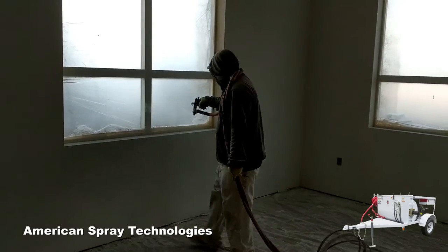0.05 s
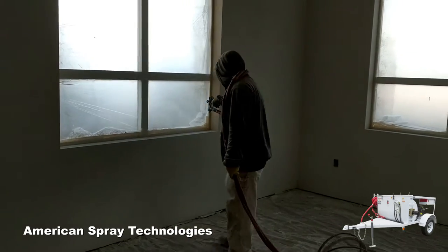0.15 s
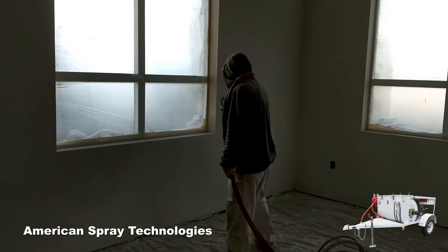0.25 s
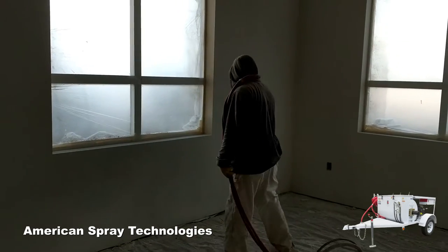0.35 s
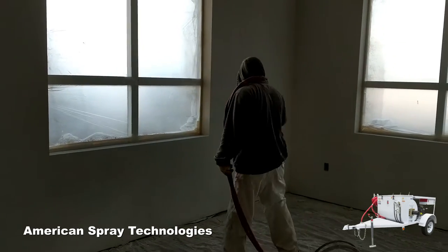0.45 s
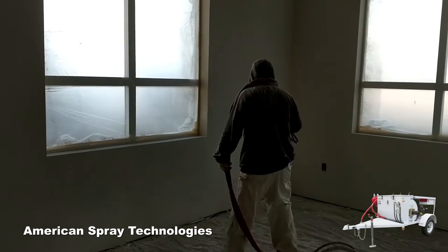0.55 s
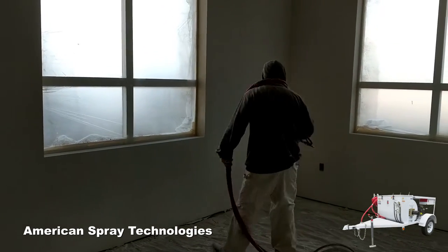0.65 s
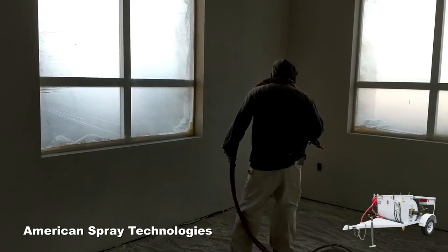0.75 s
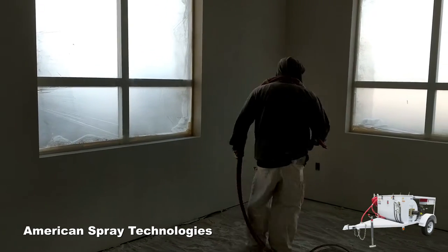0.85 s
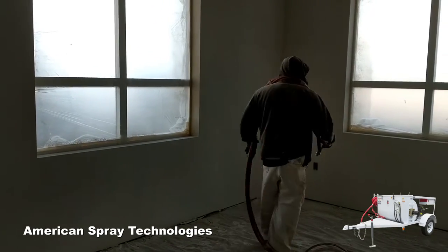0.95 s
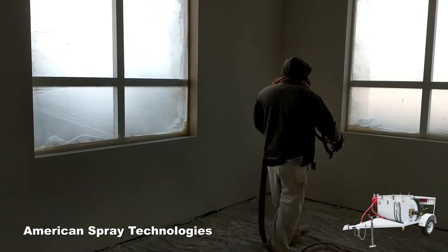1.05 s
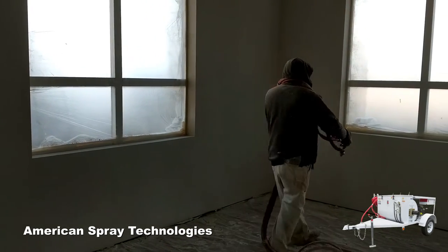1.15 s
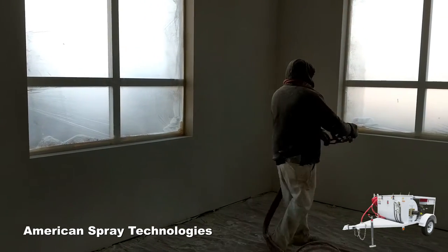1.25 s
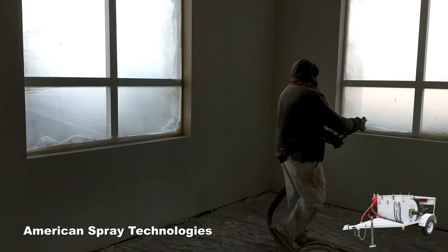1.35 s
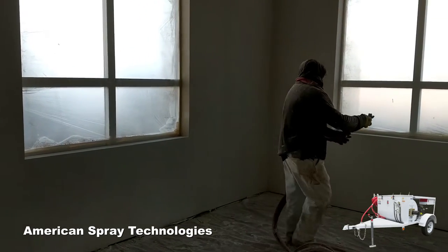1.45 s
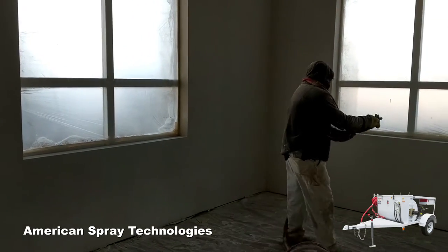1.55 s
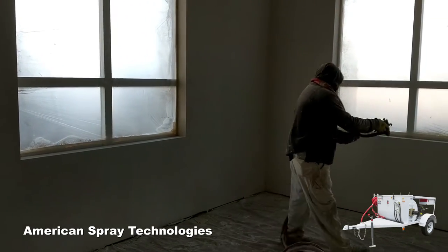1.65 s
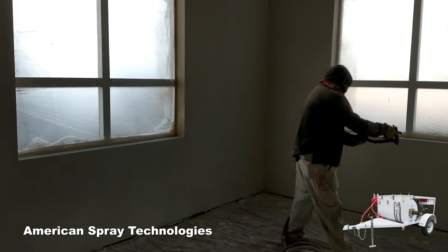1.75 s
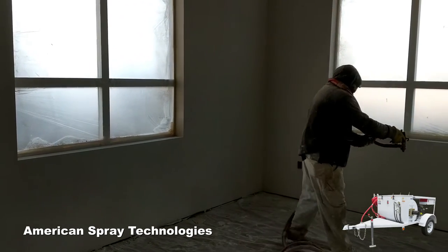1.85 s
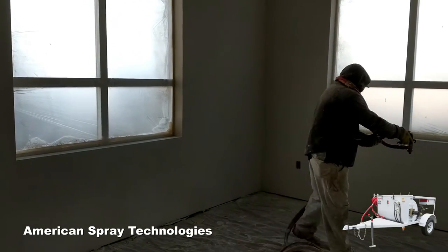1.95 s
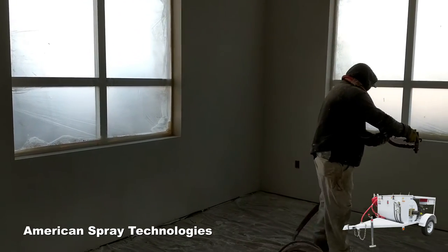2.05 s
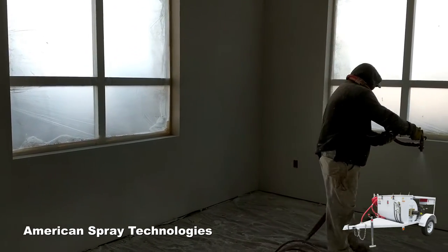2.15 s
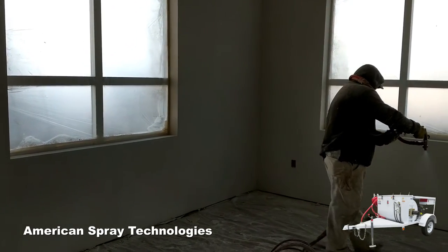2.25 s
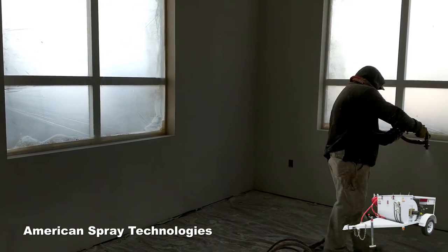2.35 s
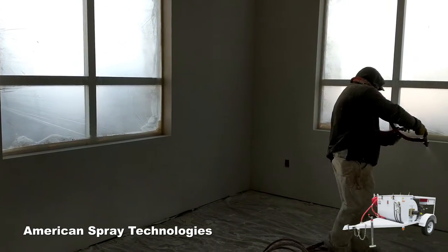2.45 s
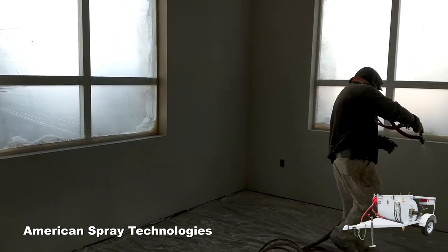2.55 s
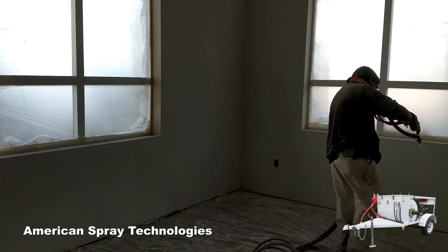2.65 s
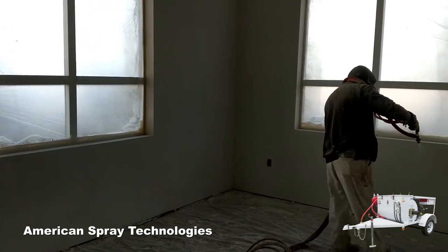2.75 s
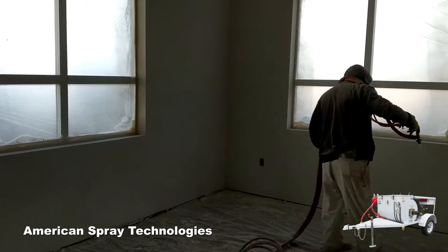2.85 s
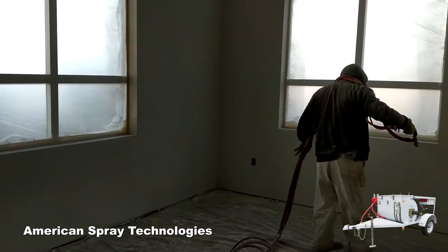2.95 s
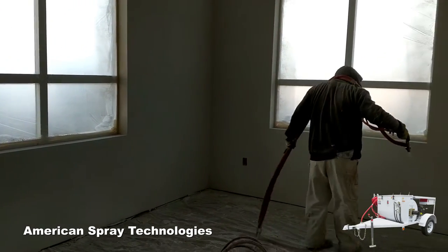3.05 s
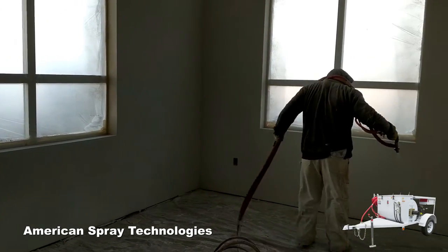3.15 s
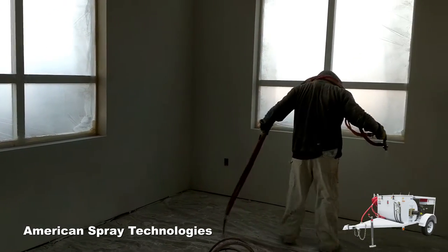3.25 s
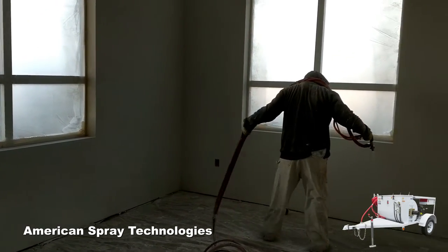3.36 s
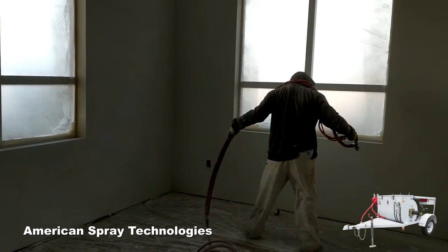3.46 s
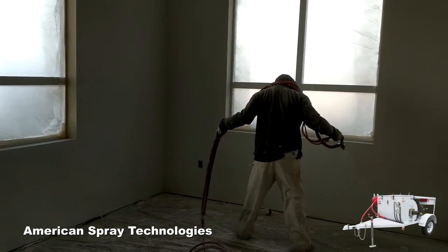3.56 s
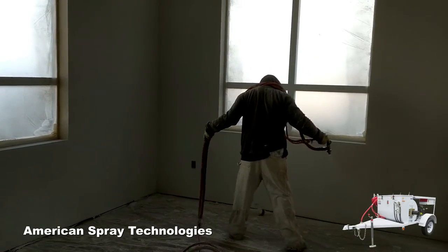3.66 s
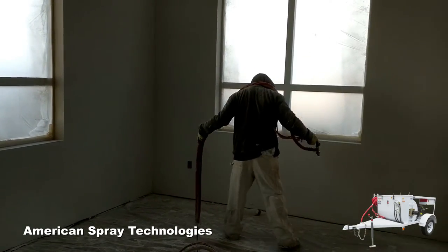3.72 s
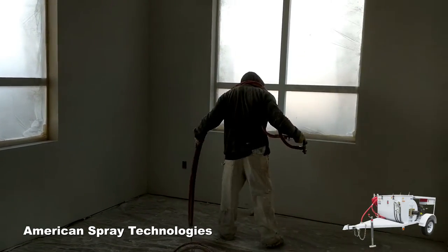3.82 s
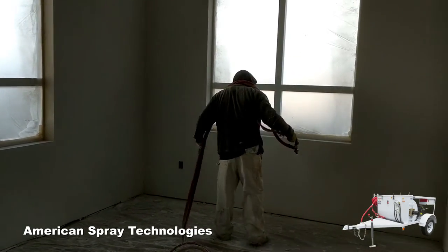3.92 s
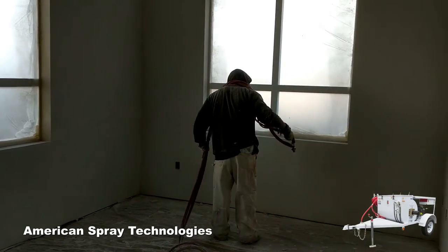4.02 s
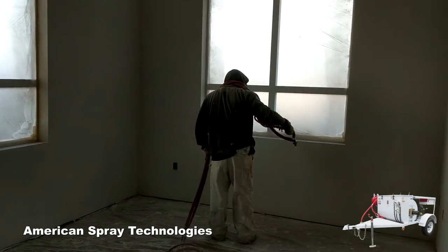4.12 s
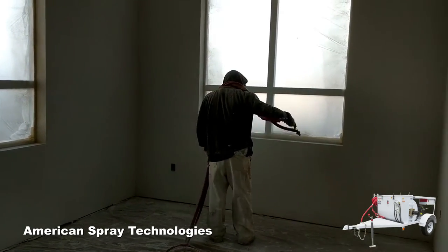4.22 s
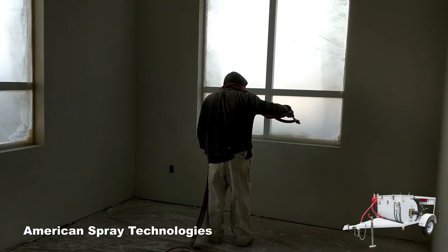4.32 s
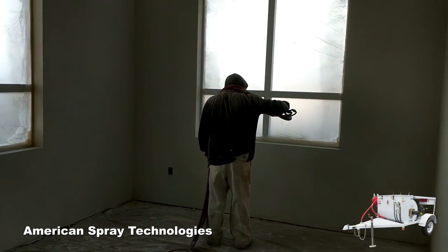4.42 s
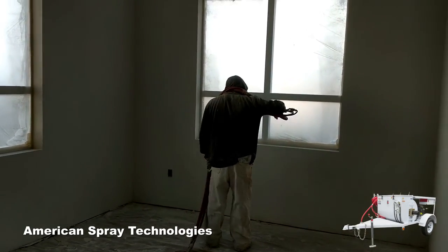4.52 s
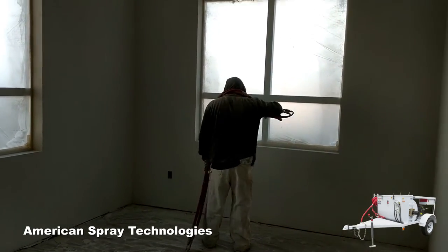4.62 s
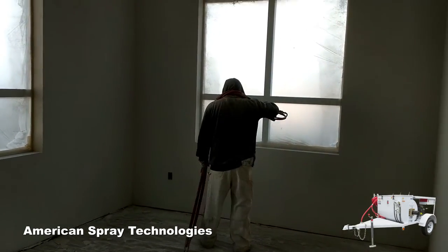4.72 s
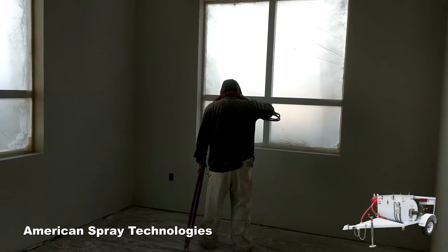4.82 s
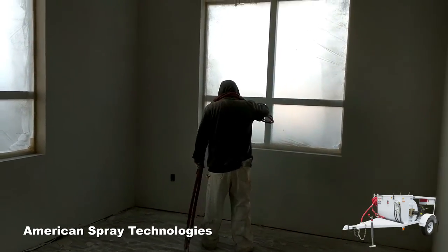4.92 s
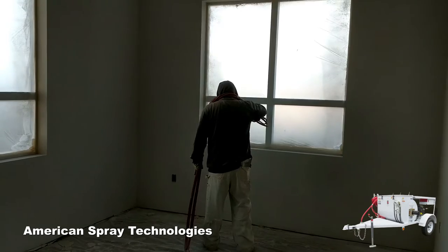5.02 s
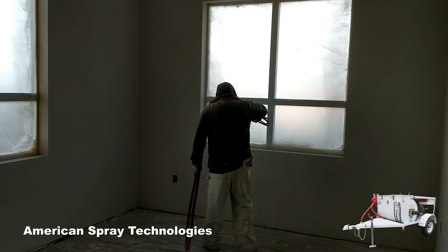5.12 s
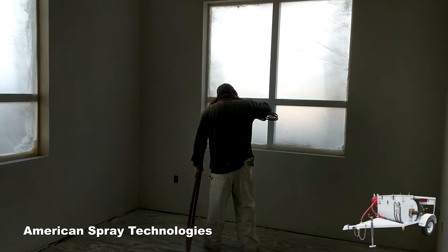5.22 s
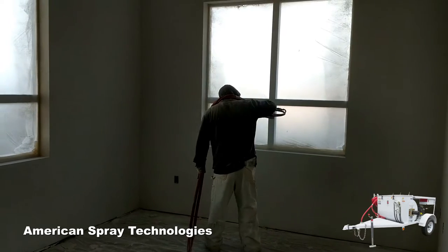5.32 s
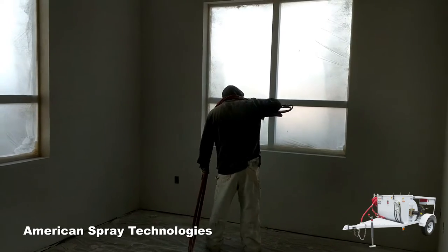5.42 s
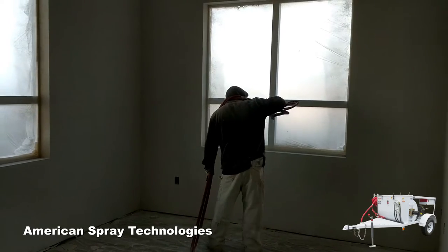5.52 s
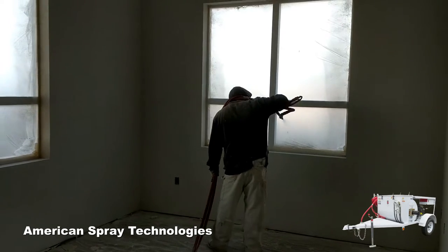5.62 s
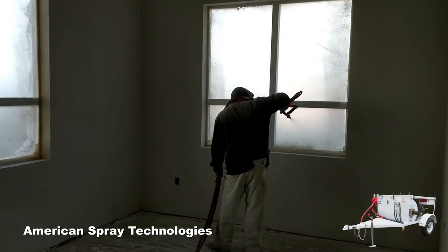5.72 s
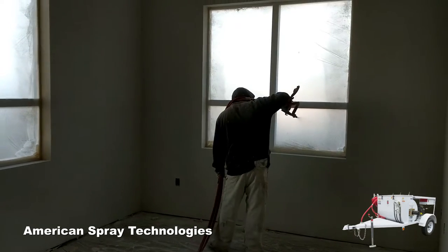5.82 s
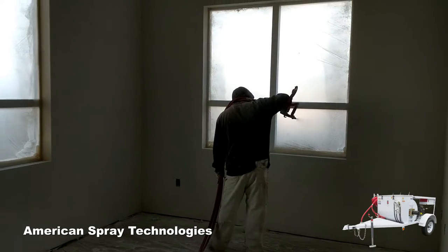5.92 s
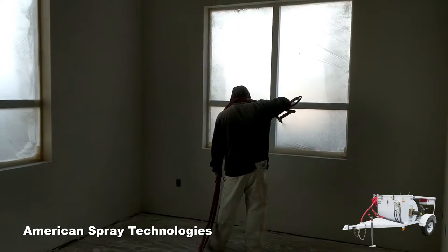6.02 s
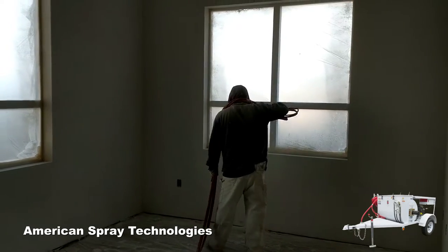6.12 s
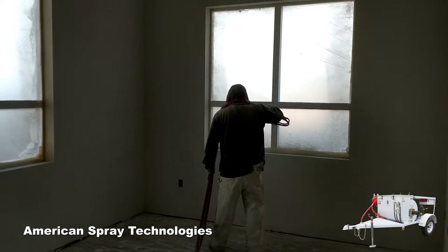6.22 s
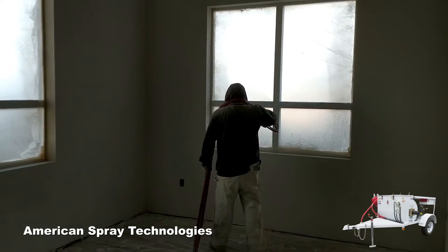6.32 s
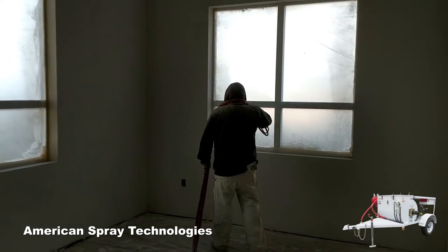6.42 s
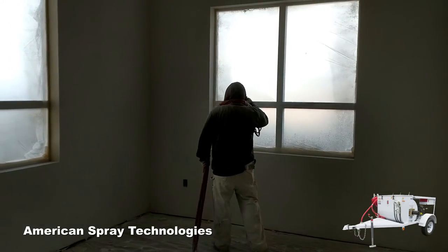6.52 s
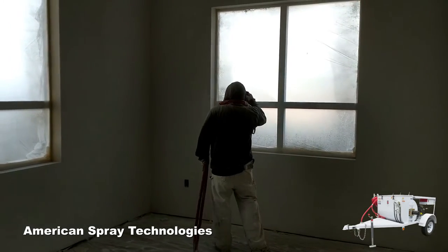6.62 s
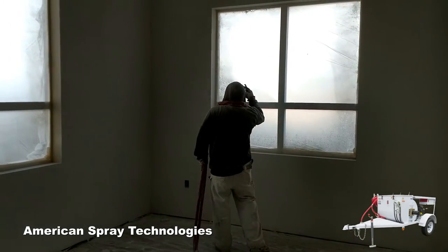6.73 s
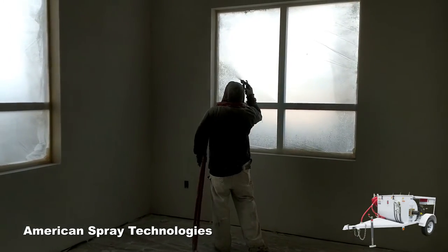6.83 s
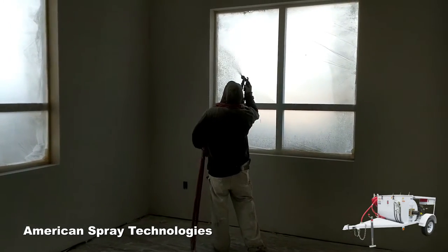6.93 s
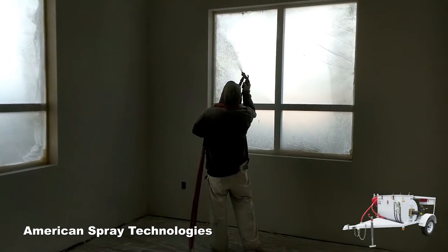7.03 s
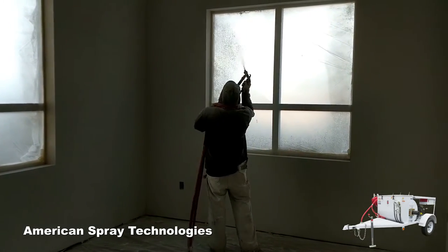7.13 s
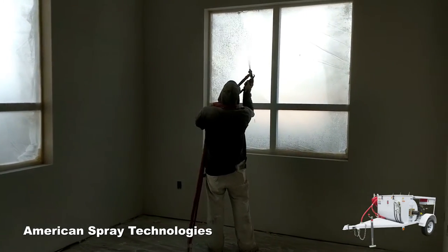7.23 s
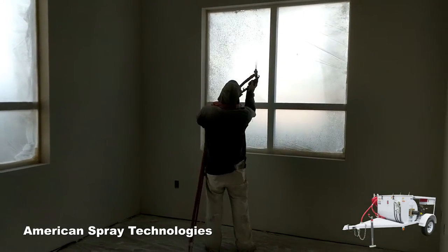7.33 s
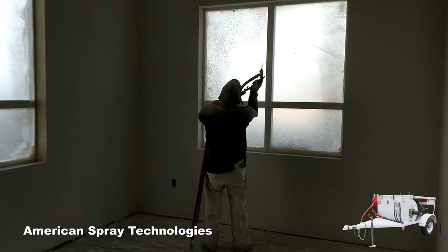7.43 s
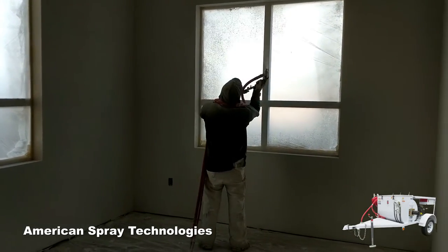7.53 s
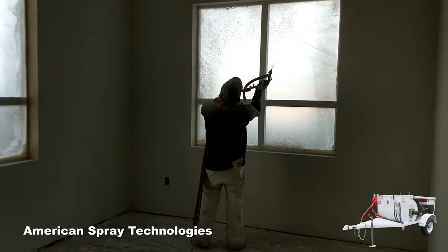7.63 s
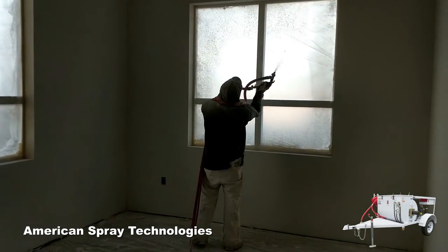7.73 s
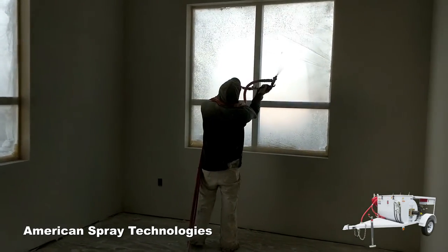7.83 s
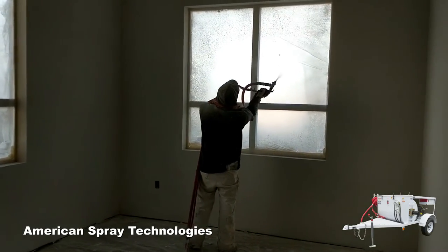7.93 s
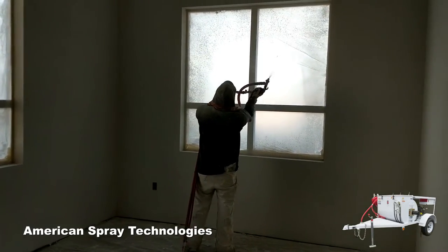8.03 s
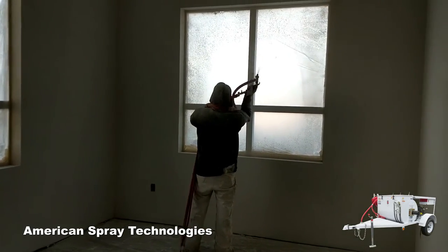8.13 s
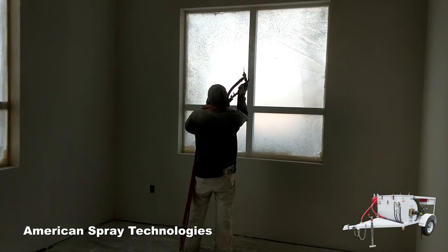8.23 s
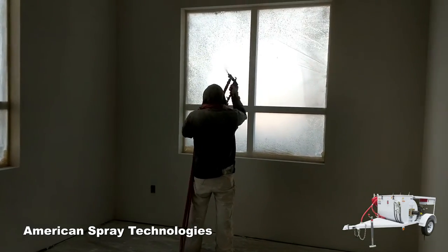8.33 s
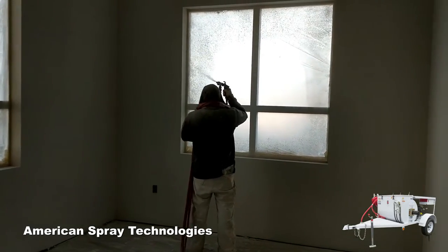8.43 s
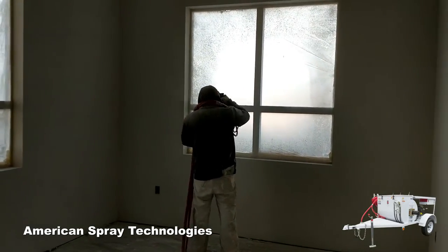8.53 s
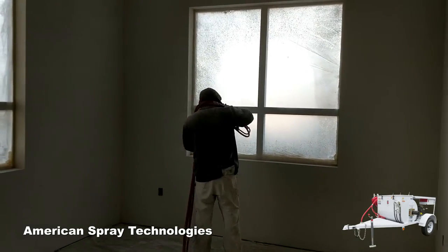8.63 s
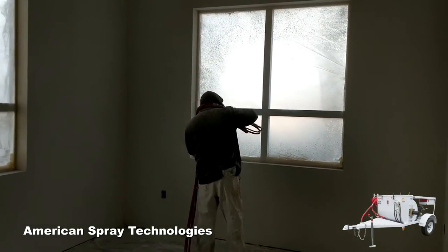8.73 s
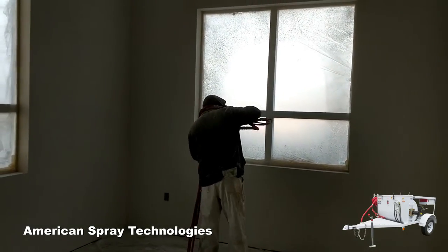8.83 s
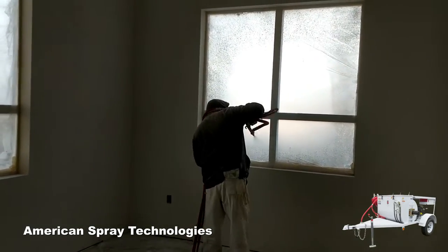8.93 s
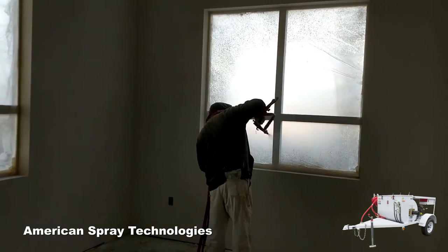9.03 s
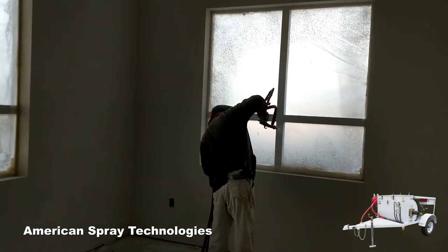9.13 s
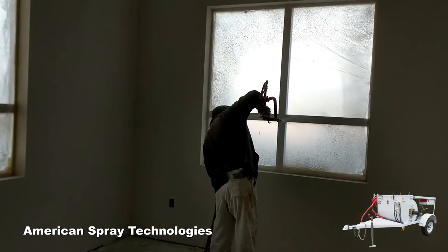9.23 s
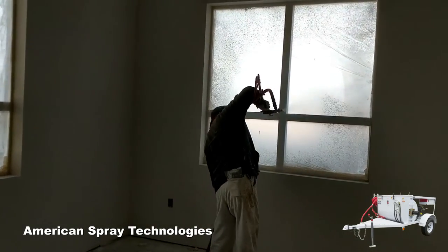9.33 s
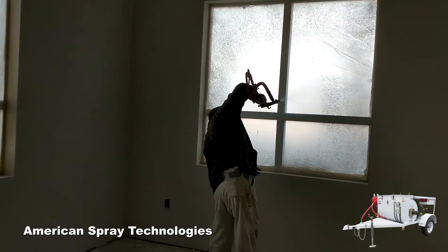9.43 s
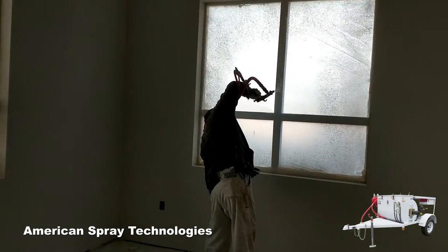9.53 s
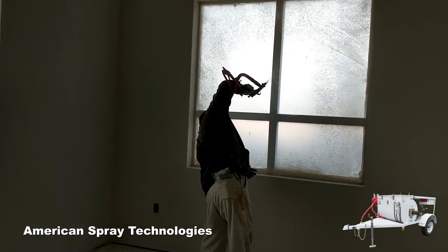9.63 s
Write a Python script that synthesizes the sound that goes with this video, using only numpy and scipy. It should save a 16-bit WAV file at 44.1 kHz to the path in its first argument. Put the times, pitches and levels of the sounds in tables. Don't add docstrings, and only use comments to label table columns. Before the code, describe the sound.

Inside an empty, echoing room, a texture sprayer hisses briefly, then pauses. Quiet steps on plastic grow louder, with sharp creasing snaps and a short hose groan over a muffled motor. The trigger opens again with a burst of air, turning into a harsh, wet, uneven spray that continues to the end; dull wind thumps hit the camera microphone, mostly on the right.

```python
import sys
import numpy as np
from scipy import signal
from scipy.fft import rfft, irfft, next_fast_len
from scipy.io import wavfile
from scipy.ndimage import uniform_filter1d, map_coordinates

SR = 44100
rng = np.random.default_rng(int(sys.argv[2]) if len(sys.argv) > 2 else 0)


def to_wav(s):
    ch = np.atleast_2d(s).T
    pcm = np.round(np.clip(ch, -1, 1) * 32767)
    wavfile.write(sys.argv[1], SR, pcm.astype(np.int16))


def ratio(d):
    e = np.asarray(d, float) / 20
    return 10 ** e


N = 426447

RELEASE_S, PULL_S, MUD_S = 0.33, 2.0285, 2.12

# f/Hz, level/dB
JET_COLOUR = [(30, -27), (250, -23.5), (700, -18), (1100, -14.5), (1700, -8.5), (2500, -5), (3300, -1),
              (3800, -2.5), (4500, -1.5), (6000, -2), (7500, 0.5), (9000, -2.5), (11500, -1), (15500, -4)]
# t/s, blast level/dB, splatter on the wall level/dB
MUD_FLOW = [(2.1, -19, 5), (2.2, -22, -1.5), (2.7, -25, 2), (3.5, -25, 4), (4.1, -25.5, -0.5),
            (4.85, -25, 2), (5.55, -23, -0.5), (6.8, -22.5, 0), (7.6, -21, 0), (8.25, -21, 0.5),
            (8.4, -23, -1), (8.85, -22.5, -1.5), (9.15, -22, 1.5), (9.67, -21, -1)]
# t/s, level change/dB, half length/s
MUD_SLUGS = [(2.758, -2, 0.037), (2.908, 2, 0.098), (3.067, -0.5, .04), (3.208, 2, 0.047), (3.6, 1, 0.046),
             (3.667, 4.5, 0.023), (3.75, 0, .02), (4.143, 1, .08), (4.37, 1, .1), (4.89, -1.5, 0.032),
             (5.057, 3, 0.05), (5.11, -6.5, .02), (5.345, 3, 0.022), (5.623, 0.5, 0.072), (6.22, 1, .05),
             (6.29, -2.5, .02), (6.713, 1, .03), (6.91, 0, 0.028), (7.66, -1.5, .05), (7.8, -2, .03),
             (7.88, -0.5, .04), (8.14, 0, .03), (9.206, -2, 0.065)]
# t/s, level/dB, slide or hold/s
FOOTSTEPS = [
    (1.0, -54, .01),
    (1.065, -54.5, 0.033),
    (1.23, -65, .03),
    (1.325, -51.5, 0.034),
    (1.49, -63, .01),
    (1.555, -48, 0.082),
    (1.74, -50, .01),
    (1.795, -47, 0.0084),
    (1.83, -54, 0.089),
    (2.01, -41.5, .02),
]
# t/s, peak level/dB
CREASE_SNAPS = [
    (1.3494, -38),
    (1.5544, -42),
    (1.7729, -20),
    (1.782, -23),
]
# f/Hz, level/dB
SHEET_COLOUR = [(300, -6), (1500, -7), (3300, -1), (7000, -4), (15500, -12)]
# t/s, hum f/Hz, level/dB
HOSE_HUM = [
    (1.62, 270, -72),
    (1.7, 283, -49),
    (1.77, 310, -51),
    (1.85, 348, -57),
    (2.0, 351, -51),
    (2.06, 352, -70),
]
# t/s, peak level/dB, push (1) or pull (-1), starting f/Hz
DRAUGHT_POPS = [(2.199, -27.5, 1, 161), (4.203, -38, 1, 300), (4.271, -38, -1, 200), (4.438, -38, 1, 280),
                (5.559, -22, -1, 220), (5.64, -28.5, 1, 238), (5.661, -28, 1, 130), (5.757, -38, 1, 240),
                (6.752, -28.5, -1, 120), (6.786, -28, -1, 210), (7.23, -24.5, 1, 190),
                (7.257, -31, -1, 280), (7.37, -28, -1, 210), (7.598, -32, 1, 240), (7.991, -32.5, -1, 240),
                (8.043, -32.5, 1, 200), (8.208, -27, -1, 300), (8.239, -21.5, -1, 220),
                (8.276, -24, 1, 210), (8.296, -34, 1, 170), (8.978, -34, 1, 110), (9.056, -32.5, -1, 230),
                (9.238, -30, 1, 240), (9.262, -25, -1, 190), (9.39, -25, -1, 120), (9.424, -26, 1, 90),
                (9.466, -27, -1, 120), (9.664, -29.5, -1, 110)]
# multiple of the firing rate, level/dB
ENGINE_ORDERS = [(1, -40), (2, -23), (3, -19), (4, -13.5), (5, -3.5), (6, 0), (7, -19), (8, -11),
                 (9, -11.5), (10, -11), (11, -18), (12, -10.5), (13, -13), (14, -12), (15, -23), (16, -32),
                 (17, -31), (18, -22), (19, -19), (20, -15.5), (21, -19), (22, -15), (24, -15), (25, -18),
                 (35, -19), (44, -14.5)]
# f/Hz, level/dB
ENGINE_COLOUR = [(25, -26), (70, -8), (130, 0.5), (250, -7.5), (400, -7.5), (700, -11), (1700, -15),
                 (2600, -12), (3250, -11.5), (3900, -18.5), (6000, -20), (9000, -21.5), (15500, -30)]
# f/Hz, time to fall 60 dB/s
WALL_RING = [(200, 0.51), (2000, 0.55), (8000, 0.63), (15000, 0.39)]
# f/Hz, likeness (0 to 1)
PORT_LIKENESS = [(100, .96), (300, .85), (600, .5), (1100, 0), (2200, .1), (4400, .08), (9000, .02)]
# f/Hz, level/dB
RIGHT_PORT_TONE = [(100, 1), (500, 2.5), (1600, .5), (2700, 2.5), (3900, 4), (4900, .5), (6000, -1),
                   (7800, -6), (8600, -12), (11700, -16), (13500, -8.5), (15300, -3)]
# f/Hz, share (0 to 1)
CROSS_SHARE = [(30, .5), (200, .78), (1100, .7), (2200, .8), (3300, .7), (4400, .66), (6500, .42),
               (8500, .14), (11000, .04), (14000, .03)]


def gun():
    t = np.arange(N) / SR
    blast_db = np.interp(t, t[::32], trigger(t[::32])[1])
    held = np.clip((RELEASE_S - t) / 0.0058, 0, 1) + (t > PULL_S)

    def shade(hz, at):
        wet, level_db = trigger(at)
        swing_db = level_db + 24
        fizz_db = 2.5 - 0.96 * swing_db
        splatter_db = -7 * (1 - wet) + wet * curves(MUD_FLOW, at)[1]
        rumble_db = -2.5 - swing_db + splatter_db
        return fizz_db / (1 + (7500 / (hz + 1)) ** 4) + rumble_db / (1 + (hz / 2200) ** 4)

    jet = rush(JET_COLOUR, patchy_db=1.07, grit_db=0.5, shade=shade)
    hissing = filtered(jet, lambda f: (f > 2500) & (f < 8000))
    power = uniform_filter1d(np.mean(hissing ** 2, 0), size=8000)
    jet = jet / np.sqrt(np.abs(power))
    unsteady_db = 0.7 * wobble(6) + 0.66 * wobble(20)
    direct = held * ratio(blast_db + 1.5 + unsteady_db) * jet
    return ratio(-3.0) * direct + ratio(-3.5) * room(direct)


def trigger(t):
    wet = np.clip((t - MUD_S) / 0.036 + .5, 0, 1)
    kick_db = 6.5 * (t > PULL_S) * np.exp(-np.abs(t - PULL_S) / .02)
    air_db = -32.5 + kick_db
    mud_db = curves(MUD_FLOW, t)[0]
    for s, db, half in MUD_SLUGS:
        mud_db = mud_db + db * np.clip(1.5 - np.abs(t - s) / half, 0, 1)
    return wet, air_db + wet * (mud_db - air_db)


def feet():
    t = np.arange(N) / SR
    press_db_per_s, lift_db_per_s = 400, 154
    rustle, snaps = np.zeros(N), np.zeros(N)
    for s, db, slide in FOOTSTEPS:
        press_db = press_db_per_s * np.clip(s - t, 0, 1)
        lift_db = lift_db_per_s * np.clip(t - s - slide, 0, 1)
        rustle += ratio(db - press_db - lift_db)
    for s, db in CREASE_SNAPS:
        snaps += (t > s) * ratio(db - 8.0 - 60 * np.abs(t - s) / 0.025)
    loudness = (t < PULL_S) * ratio(3.5) * rustle + snaps
    direct = loudness * rush(SHEET_COLOUR, patchy_db=-0.5, grit_db=1.5, centred=0.18)
    return direct + ratio(-7.5) * room(direct)


def hose():
    t = np.arange(N) / SR
    hz, db = curves(HOSE_HUM)
    hum = wobble(24.88) * np.sin(2 * np.pi * np.cumsum(hz) / SR)
    hollow = 0.52 * wobble(30.0) * np.sin(2 * np.pi * 660 * t)
    dragging = (t > HOSE_HUM[0][0]) * (t < HOSE_HUM[-1][0])
    return dragging * ratio(db + 6.0) * (hum + hollow) * [[.7], [1]]


def draught():
    events = [tuple(row) for row in DRAUGHT_POPS]
    for s, db, _, hz in DRAUGHT_POPS:
        for late, louder, push in rng.standard_normal((2, 3)):
            start = min(s + .12 * abs(late) + .02, N / SR)
            events.append((start, db - 12.5 + 3 * louder, push, hz))

    pops, t = np.zeros(N + SR), np.arange(SR // 12) / SR
    for s, db, push, hz in events:
        pitch = 62 + .65 * hz * np.exp(-t / .004) + 560 * np.exp(-t / .0009)
        thump = np.sin(2 * np.pi * np.cumsum(pitch) / SR)
        puff = 0.96 * uniform_filter1d(rng.standard_normal(len(t)), size=40)
        pop = np.sign(push) * ratio(db + 2.0 - 60 * t / 0.063) * (thump + puff)
        pops[round((s - .001) * SR):][:len(t)] += pop

    lumps = rng.standard_normal((2, N)) * ratio(5 * np.array([wobble(30), wobble(30)]))
    flutter = unit(filtered(lumps, lambda f: (f / 60) ** 3 / (1 + (f / 60) ** 3) / (1 + (f / 220) ** 2)))
    now = np.arange(0, N, 64) / SR
    stirred = np.max([ratio(db) * np.exp(-np.abs(now - s) / 0.09) for s, db, *_ in DRAUGHT_POPS], axis=0)
    stir = (now > MUD_S) * (ratio(-60) + ratio(-22) * stirred)
    return pops[:N] * [[.05], [1]] + np.interp(np.arange(N) / SR, now, stir) * flutter


def engine():
    firing_hz = 24.2 * (1 + .002 * wobble(3))
    turn = 2 * np.pi * np.cumsum(firing_hz) / SR
    tones = np.zeros((2, N))
    for k, db in ENGINE_ORDERS:
        level_db = db - 4 * np.log2(max(k / 6, 1)) + k / 10 * wobble(6)
        port_shift = np.array([[0], [rng.normal(0, k / 25)]])
        tones += ratio(level_db) * np.sin(k * turn + rng.uniform(0, 7) + port_shift)
    throb = ratio(2 * np.cos(turn))
    noise = rush(ENGINE_COLOUR, patchy_db=0.5, centred=.35)
    return ratio(-44.5) * tones + ratio(-51.5) * throb * noise


def room(x):
    hz, t, z = signal.stft(x, SR, nperseg=512)
    keep = ratio(-120 * (t[1] - t[0]) / along(WALL_RING, hz))
    power = uniform_filter1d(np.mean(np.abs(z) ** 2, 0), size=5, axis=0)
    for k in range(len(t)):
        power[:, k] = (1 - keep) * power[:, k] + keep * power[:, max(k - 1, 0)]
    fresh = signal.stft(rng.standard_normal(x.shape), nperseg=512)[2]
    ringing = fresh / np.std(fresh) * np.sqrt(np.abs(power))
    return signal.istft(ringing, SR, nperseg=512)[1][:, :N]


def rush(spectrum, patchy_db=1.0, grit_db=0.0, shade=lambda hz, t: 0, centred=0):
    sputter = ratio(grit_db * wobble(400))
    hz, t, z = signal.stft(rng.standard_normal((2, N)) * sputter, SR, nperseg=512)
    field = rng.standard_normal(z.shape[1:])
    patches = unit(uniform_filter1d(uniform_filter1d(field, 8, 0), 12, 1))
    z = z * ratio(patchy_db * patches + shade(hz[:, None], t))
    pair = signal.istft(z, SR, nperseg=512)[1][:, :N]

    def mid_and_side(f):
        likeness = np.clip(along(PORT_LIKENESS, f) + centred * (f > 1900), -1, 1)
        angle = np.arccos(likeness) / 2
        return ratio(along(spectrum, f)) * np.array([np.cos(angle), np.sin(angle)])

    mid, side = filtered(pair, mid_and_side)
    return unit(np.array([mid + side, mid - side]))


def unit(x):
    return x / np.sqrt(np.mean(x ** 2) + 1e-20)


def along(points, hz):
    f, v = np.transpose(points)
    return np.interp(np.log(hz + 1), np.log(f + 1), v)


def curves(rows, t=None):
    s, *cols = np.transpose(rows)
    at = np.arange(N) / SR if t is None else t
    return [np.interp(at, s, c) for c in cols]


def wobble(rate):
    at = np.arange(0, N + 16, 16)
    knots = rng.standard_normal(int(N * rate / SR) + 4)
    return np.interp(np.arange(N), at, map_coordinates(knots, [at * rate / SR]))


def filtered(x, response):
    m = next_fast_len(N + SR // 2)
    return irfft(rfft(x, m) * response(np.fft.rfftfreq(m, 1 / SR)), m)[..., :N]


def camera_gain_db():
    t = np.arange(N) / SR
    recover_s, startle_s = 0.62, 1.76
    rise_db = 10 * np.clip(t - recover_s, 0, startle_s - recover_s)
    sag_db = 12 * np.clip(t - startle_s, 0, 1)
    pause_db = -7 + rise_db - sag_db
    spray_db = -12 - 6.5 * np.exp(-((t - PULL_S) / 1.9) ** 4)
    return pause_db + (spray_db - pause_db) * np.clip((t - PULL_S) / .1, 0, 1)


def scene():
    return gun() + feet() + hose() + draught() + ratio(camera_gain_db()) * engine()


def starved(pair, under_db):
    z = signal.stft(pair, nperseg=2048)[2]
    size = 8
    edges = np.arange(0, 1025, size)
    power = np.add.reduceat(np.abs(z) ** 2, edges, axis=1)
    waver_db = 5 * unit(uniform_filter1d(rng.standard_normal(power.shape[1:]), size=3, axis=1))
    strong = power > power[::-1] * ratio(2 * (waver_db - under_db))
    kept = strong | (edges[:, None] < 75)
    return signal.istft(z * np.repeat(kept, size, axis=1)[:, :1025], nperseg=2048)[1][:, :N]


def band_limit(x):
    return signal.sosfilt(signal.butter(12, 16840, fs=SR, output="sos"), x)


def record(dry):
    def port_tone(f):
        passed = f < 15520
        return np.array([passed, ratio(along(RIGHT_PORT_TONE, f)) * passed])

    def cross_path(f):
        delay_s = 1 / 2190
        return np.clip(along(CROSS_SHARE, f), 0, 1) * np.exp(-2j * np.pi * f * delay_s)

    ports = filtered(dry, port_tone)
    cross = filtered(ports, cross_path)
    hiss = filtered(rng.standard_normal((2, N)), lambda f: (f / 1500) / (1 + f / 1500) / (1 + (f / 5500) ** 6))
    wide = ports - cross[::-1] + ratio(camera_gain_db() - 66) * hiss
    left, right = starved(wide, under_db=18.5)
    mid, side = starved(np.array([left + right, left - right]) / 2, under_db=12.5)
    return band_limit(np.array([mid + side, mid - side]))


dry = scene()
out = record(dry)
to_wav(out)
```